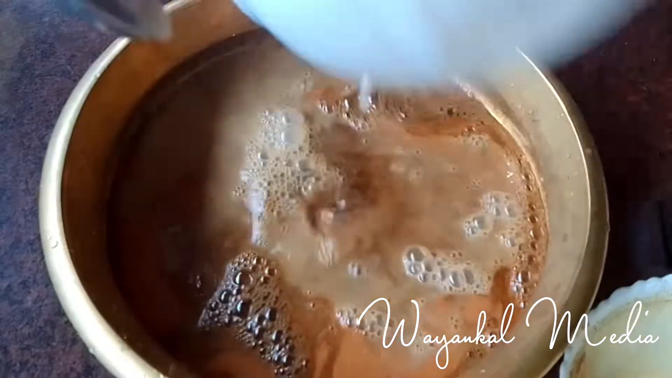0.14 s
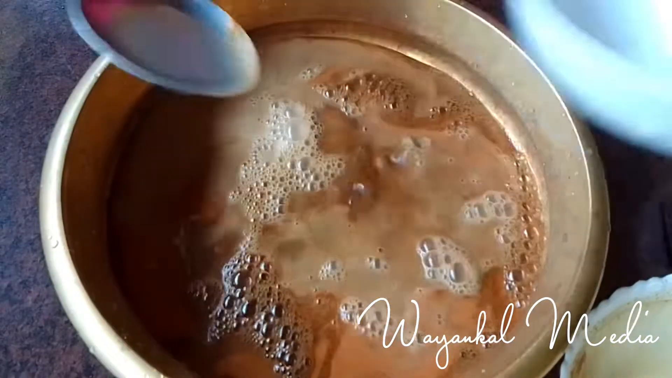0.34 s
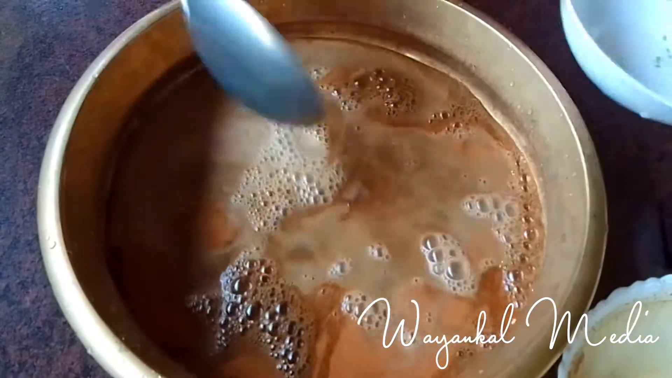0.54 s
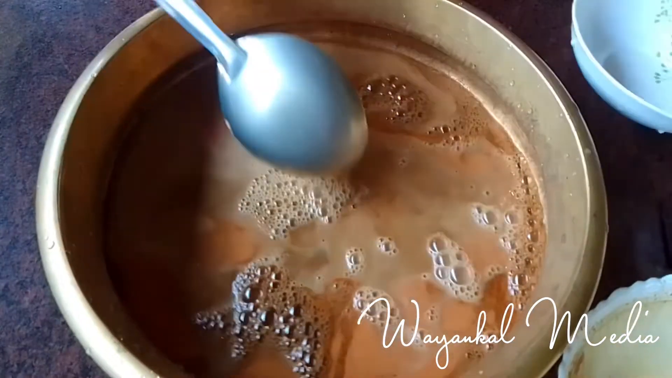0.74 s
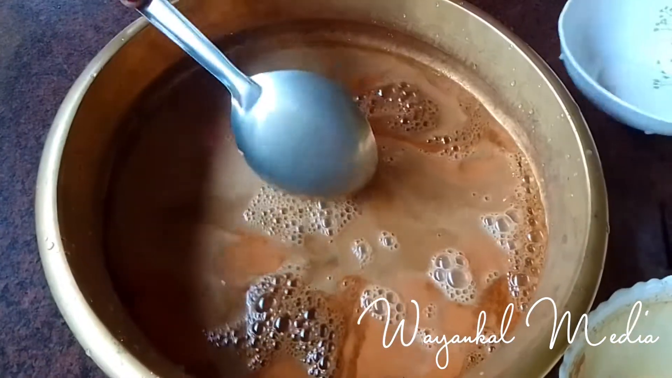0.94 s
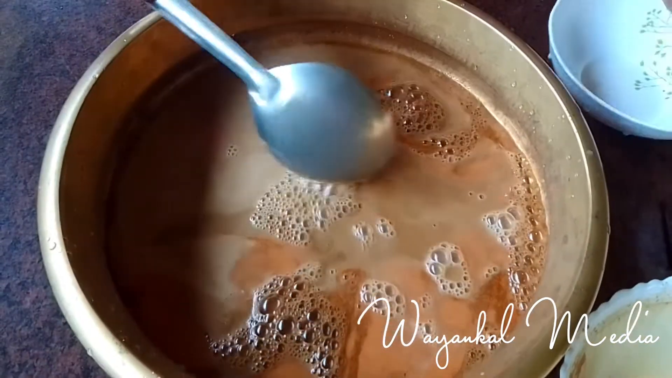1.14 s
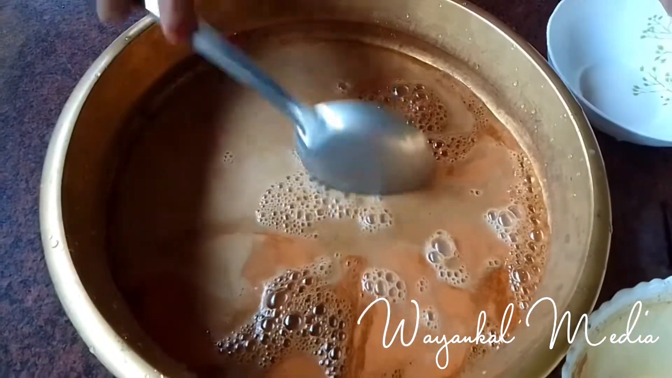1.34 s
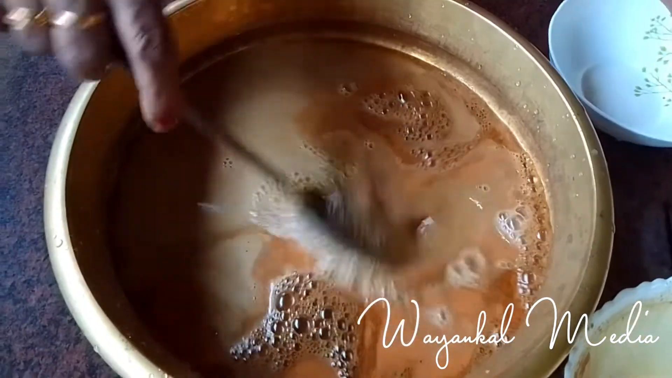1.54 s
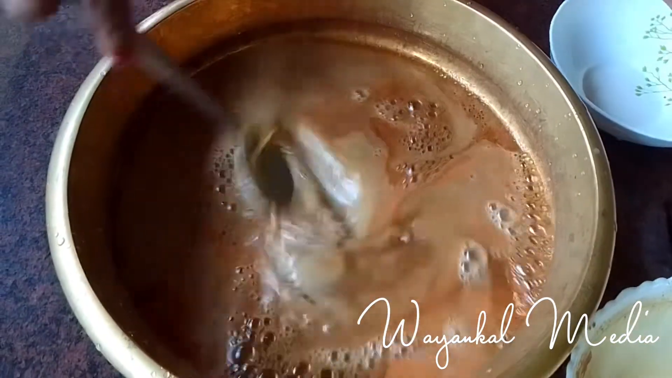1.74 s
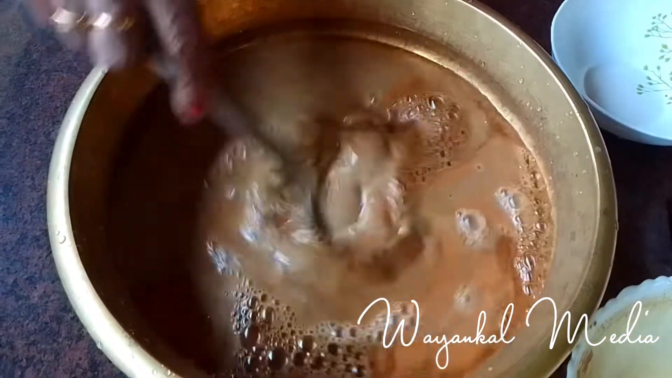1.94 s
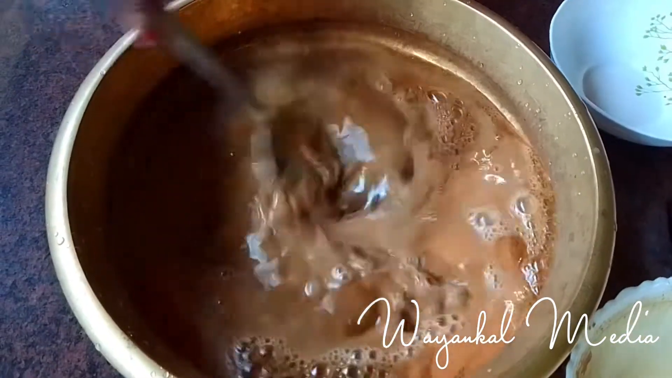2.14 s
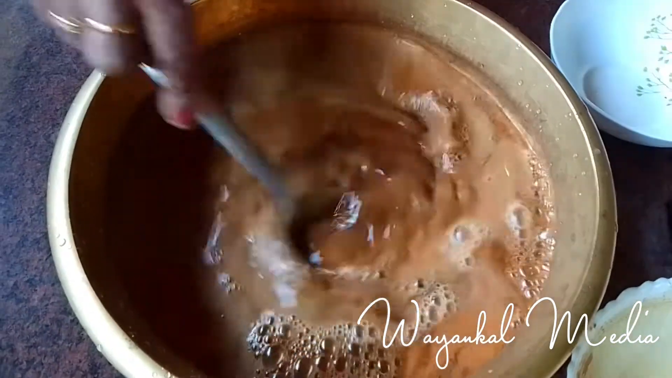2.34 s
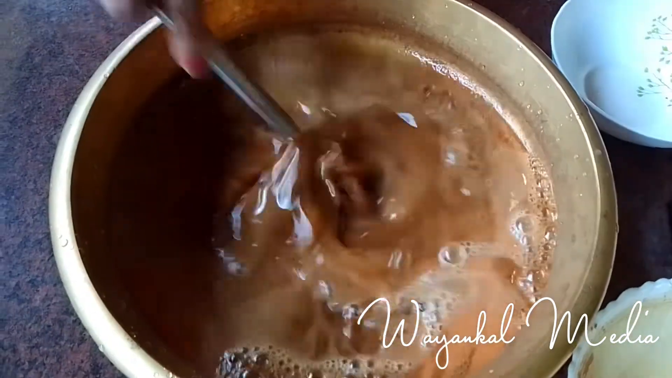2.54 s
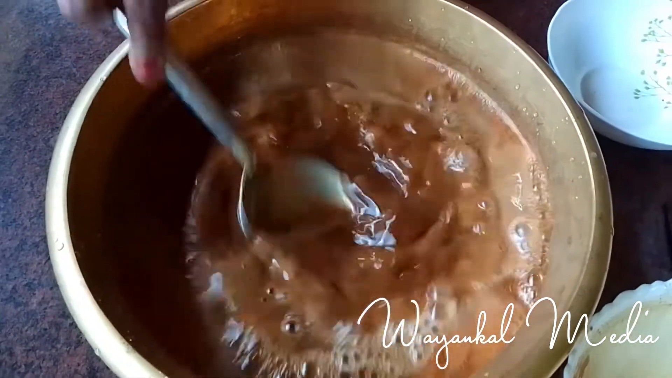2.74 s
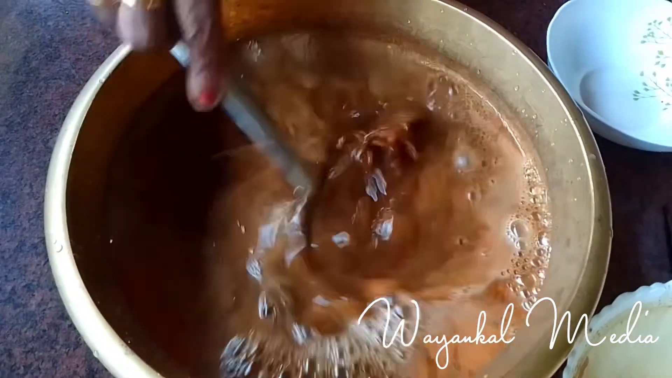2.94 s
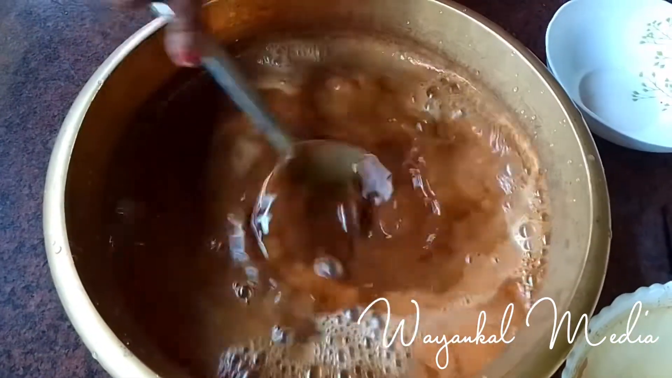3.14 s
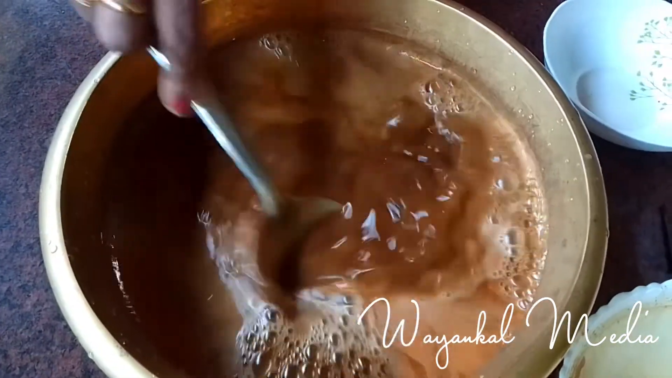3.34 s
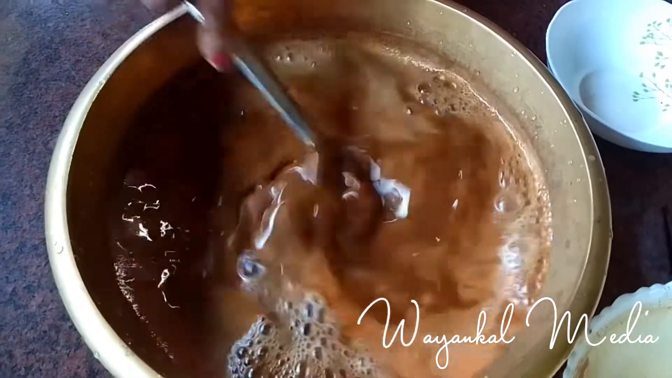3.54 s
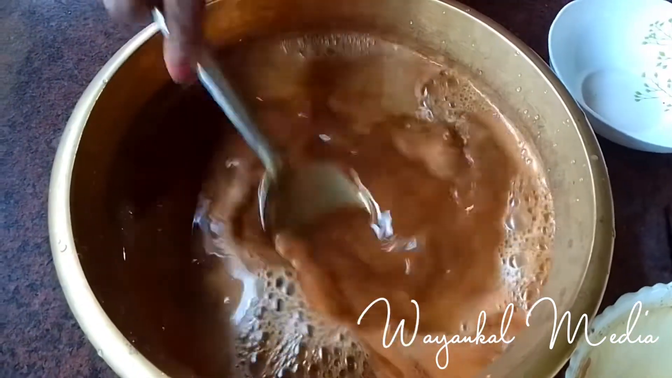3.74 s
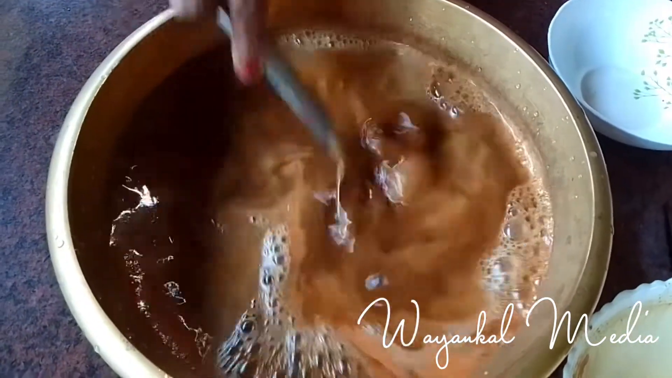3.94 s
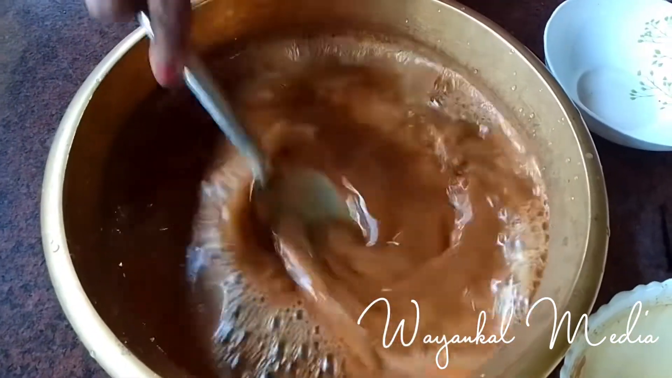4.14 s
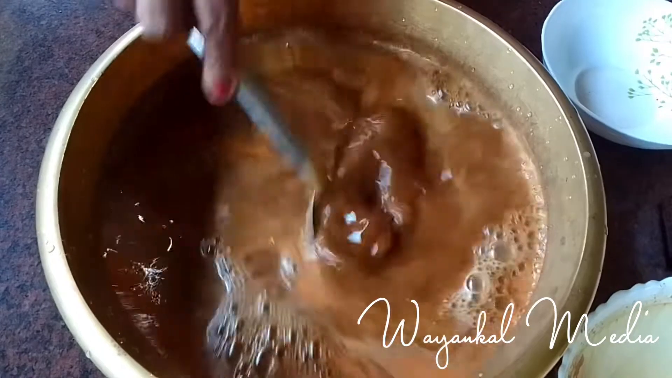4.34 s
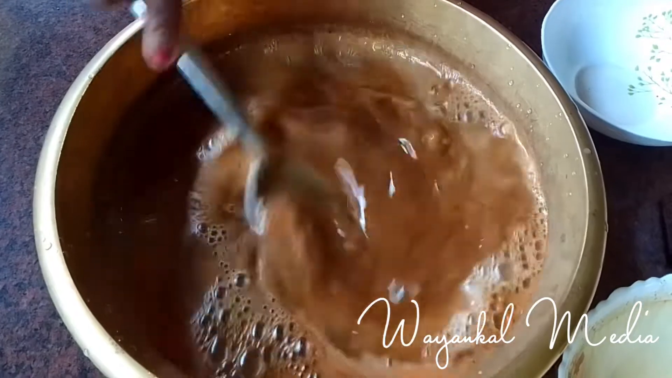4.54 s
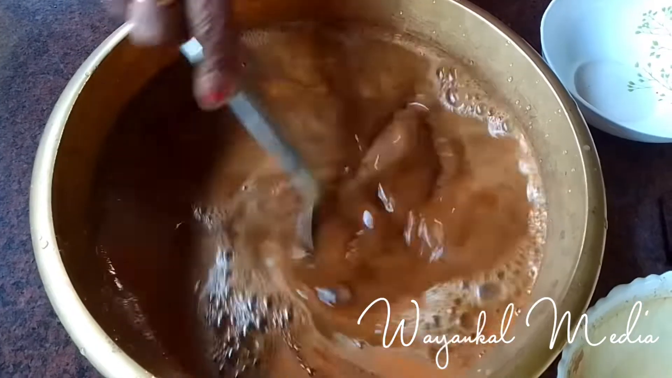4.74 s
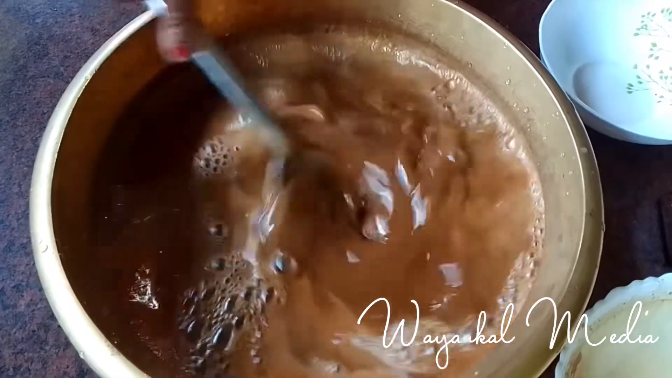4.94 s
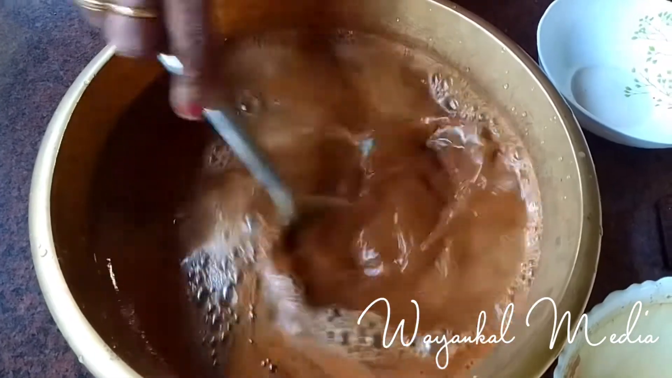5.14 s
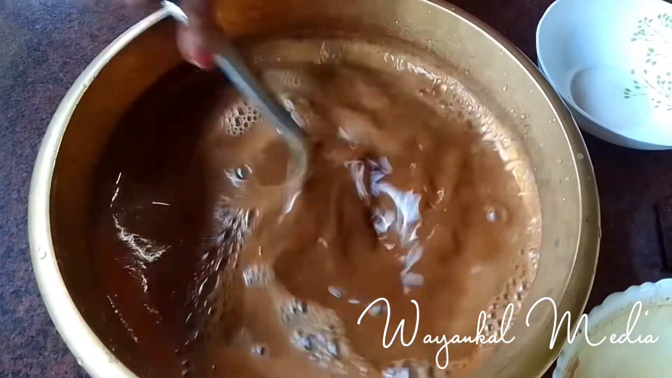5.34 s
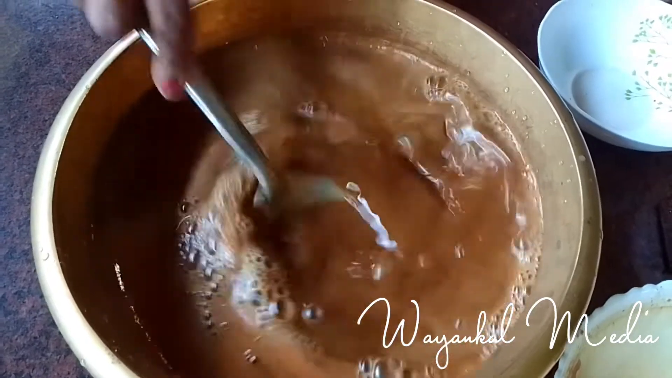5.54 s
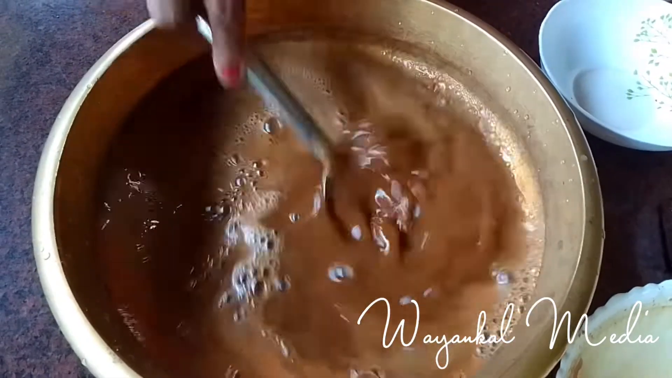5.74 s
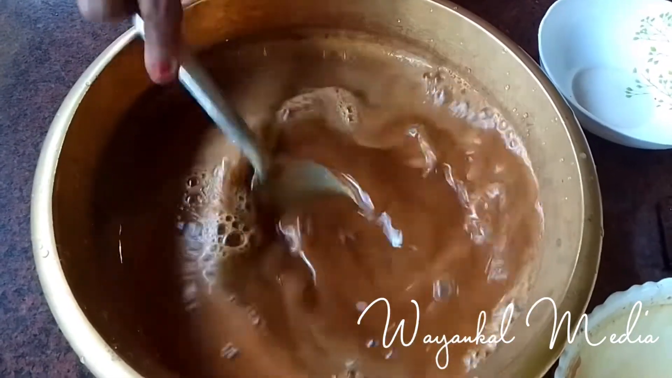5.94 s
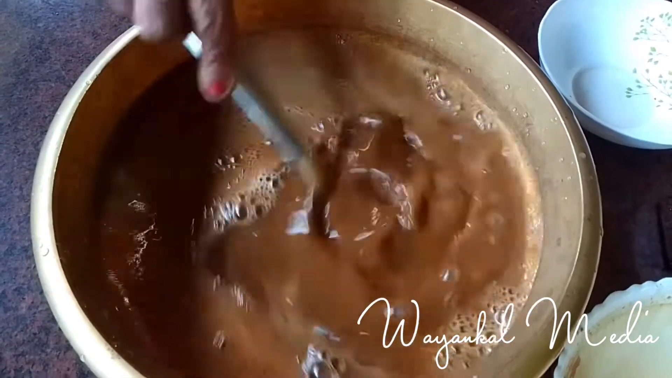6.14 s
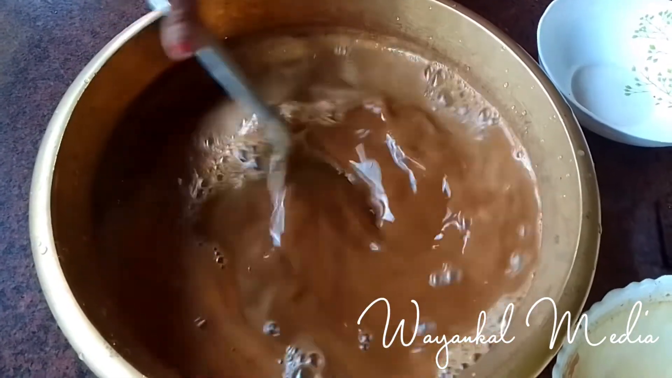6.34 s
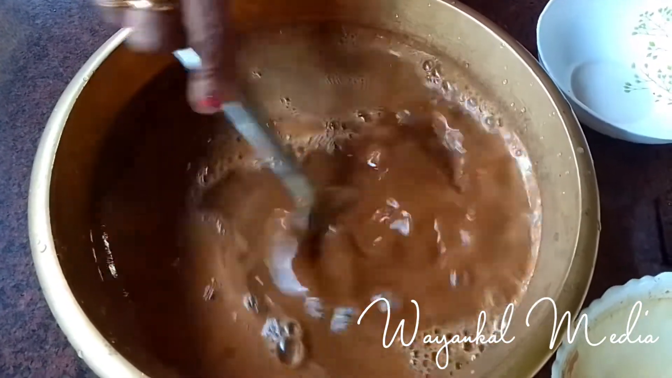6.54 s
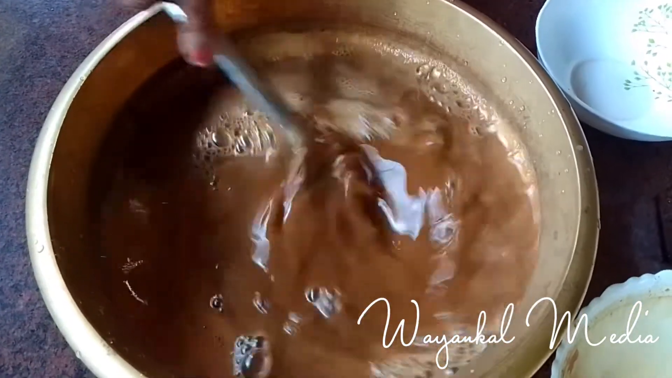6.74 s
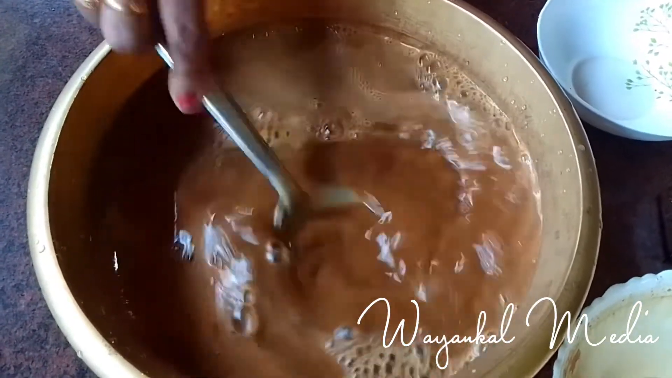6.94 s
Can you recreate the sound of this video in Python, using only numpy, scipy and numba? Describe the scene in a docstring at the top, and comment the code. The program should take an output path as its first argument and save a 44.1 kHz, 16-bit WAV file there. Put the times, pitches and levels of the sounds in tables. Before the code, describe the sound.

The last of a pour dribbles into a pot, a china bowl clatters down, a spoon knocks the rim, then brisk watery stirring continues.

```python
"""The last of some water splashes into a wide brass pot of thin liquid; a china bowl lands and rocks on the counter.
A steel spoon bumps and scrapes the counter, knocks the pot, then stirs: swarms of damped sines make the bubbles
and spray, and gliding tones with a froth of noise make the gulps where air pockets close.
Drifting resonances give the pot's hollow and decaying noise a small kitchen; a few drops tap the close microphone
with short low modes, over filtered-noise air, a low rumble and a wavering hum."""
import sys
import numpy as np
from scipy import signal
from scipy.fft import rfft, irfft, next_fast_len
from scipy.io import wavfile
from scipy.ndimage import map_coordinates
from numba import njit

SR = 44100
rng = np.random.default_rng(int(sys.argv[2]) if len(sys.argv) > 2 else 0)


def wav_out(sig):
    """Save sig, one row per channel (or a flat mono array), as 16-bit PCM at SR to the path in sys.argv[1]."""
    wavfile.write(sys.argv[1], SR, np.round(np.clip(np.atleast_2d(sig).T, -1, 1) * 32767).astype(np.int16))


N = 307818
TIME = np.arange(N) / SR
RING = TIME[:SR]  # one second, for anything that dies away

# Tone of a blow on the counter, also lent to the spoon's clack on the pot.
# Each row: frequency in Hz, level in dB.
COUNTER_COLOUR = [(88, -45.5), (130, -32.5), (210, -12.5), (464, -16), (513, -12), (628, -9.5), (974, -9),
                  (1080, -1.5), (1510, -5), (2860, -25.5), (3170, -29), (3880, -33), (4510, -33),
                  (4910, -44), (8420, -50.5), (10900, -68.5), (18500, -120)]
# Ringing modes of the steel spoon. Each row: frequency in Hz, level in dB, 60 dB decay time in s.
SPOON_MODES = [(3000, -10, .25), (3380, -7, 0.12), (3580, -7, 0.16), (3620, 6, 0.054), (4840, -7.5, .05),
               (5728, -18, .1), (6540, -12, 0.11), (6480, 0, 0.091), (6800, -17, .2), (8511, -24, 0.2)]


def undb(db):
    """Decibels to gain."""
    return 10 ** (np.asarray(db) / 20)


def unit(x):
    """Scale to rms 1."""
    return x / np.sqrt(np.mean(x ** 2))


def at(points, hz):
    """Read (Hz, value) points on a log-frequency axis."""
    f, value = np.transpose(points)
    return np.interp(np.log(np.maximum(hz, 1)), np.log(f), value)


def colour(x, points):
    """Filter by a (Hz, dB) spectrum, causally so that attacks stay sharp."""
    size = next_fast_len(len(x) + SR // 2, True) * 2
    gain = undb(at(points, np.arange(size // 2 + 1) * SR / size))
    # folding the cepstrum forward gives minimum phase
    cepstrum = irfft(np.log(gain))
    cepstrum[1:size // 2] *= 2
    cepstrum[size // 2 + 1:] = 0
    return irfft(rfft(x, size) * np.exp(rfft(cepstrum)))[:len(x)]


def band(x, low_hz, high_hz, order=2):
    """Butterworth band-pass."""
    return signal.sosfilt(signal.butter(order, [low_hz, high_hz], "band", fs=SR, output="sos"), x)


def add(track, s, sound):
    """Mix a sound in at time s."""
    start = max(int(s * SR), 0)
    track[start:start + len(sound)] += sound[:N - start]


def fade(t60):
    """Exponential decay over one second, falling 60 dB in t60 seconds."""
    return np.exp(-np.log(1000) * RING / t60)


def drift(per_s):
    """A random wander through per_s new values a second, with a spread near 1."""
    return np.interp(TIME * per_s, np.arange(512), rng.standard_normal(512))


def churn():
    """Stirred liquid: a swarm of bubbles, a gliding trickle, dense spray, finer mist, and faint deep gurgles."""
    # Tone of the stirred liquid. Each row: frequency in Hz, level in dB.
    stir_colour = [(530, -54), (920, -25), (1060, -1.5), (1250, -4.5), (1370, 2), (1600, -3), (1740, -5.5),
                   (2380, -10.5), (2850, -16.5), (3150, -22), (3460, -16), (4020, -17.5), (4600, -24),
                   (5000, -27), (5400, -31.5), (6480, -31.5), (8420, -48), (10900, -76.5), (18500, -120)]
    bubble_gain, spray_gain, mist_gain = stirring()
    bubbles = cloud(stir_colour, per_s=1800, low_hz=1000, high_hz=2804, cycles=16,
                    spread_db=4.5, rise=0.05, cluster_db=1.5, clusters_per_s=22)
    spray = cloud(stir_colour, per_s=6000, low_hz=2351, high_hz=5380, cycles=9,
                  spread_db=4.0, rise=0.023, cluster_db=2.9, clusters_per_s=19)
    mist = cloud(stir_colour, per_s=4500, low_hz=4900, high_hz=9470, cycles=10,
                 spread_db=5.0, rise=0.019, cluster_db=3.0, clusters_per_s=22)
    # lone bubbles that ring longer and glide upward as they surface
    trickle = cloud(stir_colour, per_s=130, low_hz=1450, high_hz=4408, cycles=32,
                    spread_db=3.0, rise=0.07, cluster_db=2.0, clusters_per_s=12)
    when, pitch, loud = rng.random((900, 3)).T
    deep_hz = 330 * 2.5 ** pitch
    deep_size = undb(3.0 * loud + 9 * pitch)
    deep = ring_bubbles(when * N, deep_hz, np.full(len(when), 3.), deep_size, .04 * pitch)
    swarm = undb(-8) * bubbles + undb(-14) * trickle + undb(-33) * unit(deep)
    # the liquid breaks in fits, all sizes of drop at once
    spatter_db, spatters_per_s = 3.5, 45
    spatter = unit(undb(spatter_db * drift(spatters_per_s)))
    return swirl(bubble_gain * swarm + spatter * (spray_gain * spray + mist_gain * mist))


def stirring():
    """Bubble, spray and mist gains over time; overlapping surges add in power."""
    # Short overlapping surges of bubbles, spray and mist in the stirred liquid. Each row: start in seconds,
    # length in seconds, bubble level in dB, spray level in dB, fine mist level in dB.
    surges = [(1.722, 0.054, -48, -69.5, -83), (1.825, 0.123, -45.5, -65.5, -68),
              (1.943, 0.17, -43.5, -58.5, -70), (2.136, 0.1, -42.5, -62.5, -67.5),
              (2.224, 0.15, -41.5, -58, -63), (2.332, 0.11, -43, -60, -65.5),
              (2.466, 0.16, -42.5, -62.5, -69.5), (2.62, 0.048, -53, -58.5, -70),
              (2.676, 0.2, -42, -59, -70.5), (2.817, 0.1, -53, -61, -66), (2.933, 0.15, -45, -58.5, -72),
              (3.098, 0.24, -47, -58, -71), (3.274, 0.15, -48, -60, -76.5),
              (3.417, 0.11, -41, -60.5, -74.5), (3.585, 0.092, -45, -60, -70),
              (3.718, 0.18, -49, -61.5, -76.5), (3.874, 0.093, -47.5, -60.5, -66.5),
              (3.973, 0.17, -42.5, -54.0, -67.5), (4.151, 0.18, -49, -60.5, -73.5),
              (4.309, 0.074, -45, -57, -64), (4.38, 0.18, -43.5, -60.5, -70.5),
              (4.534, 0.16, -44.5, -66, -71), (4.694, 0.16, -44.5, -56.5, -65.5),
              (4.861, 0.15, -43, -64.5, -67), (5.018, 0.22, -41.5, -58.0, -65),
              (5.224, 0.21, -47, -63, -69.0), (5.425, 0.14, -44.0, -59.5, -68.5),
              (5.577, 0.195, -48, -63.5, -79.5), (5.775, 0.23, -44, -59.5, -72.5),
              (6.013, 0.12, -45.5, -57.0, -72.5), (6.101, 0.12, -47, -57.5, -68),
              (6.198, 0.11, -44, -61.5, -73), (6.351, 0.1, -45, -57.5, -73.5),
              (6.477, 0.11, -42.5, -57.5, -65.5), (6.566, 0.11, -44.5, -58.0, -73),
              (6.724, 0.121, -46, -62, -67.5), (6.83, 0.17, -43.5, -59.5, -69.5)]
    bubbles, spray, mist = np.zeros((3, N))
    for s, length, bubble_db, spray_db, mist_db in surges:
        # bubbles gather more slowly than the spray and outlast it
        quick = swell_and_sag(length, attack_s=0.027, release_s=0.023, sag_db_per_s=12)
        slow = swell_and_sag(length, attack_s=0.034, release_s=0.065, sag_db_per_s=6)
        add(bubbles, s, (undb(bubble_db) * slow) ** 2)
        add(spray, s, (undb(spray_db) * quick) ** 2)
        add(mist, s, (undb(mist_db) * quick) ** 2)
    return np.sqrt([bubbles, spray, mist])


def swell_and_sag(length, attack_s, release_s, sag_db_per_s):
    """A level that rises in a straight line, sags steadily and dies away after its length."""
    attack = np.minimum(RING / attack_s, 1)
    release = np.exp(-np.maximum(RING - length, 0) / release_s)
    return attack * undb(-sag_db_per_s * RING) * release


def cloud(spectrum, per_s, low_hz, high_hz, cycles, spread_db, rise, cluster_db, clusters_per_s):
    """A swarm of bubbles, mostly faint, a few loud, shed in clusters of like size; rms 1."""
    when, pitch, damping, loud, climb = rng.random((int(per_s * N / SR), 5)).T
    hz = low_hz * (high_hz / low_hz) ** pitch
    life = cycles * 2 ** (2 * damping - 1)
    # a random map over time and half-octaves of pitch lifts neighbours together
    place = [when * N / SR * clusters_per_s, 2 * np.log2(high_hz / hz)]
    cluster = map_coordinates(rng.standard_normal((512, 8)), place, order=1, mode="mirror")
    level_db = cluster_db * cluster - spread_db * np.log(loud + 0.0063)
    size = undb(level_db) * hz / np.sqrt(life)  # equal power per Hz before colouring
    bubbles = ring_bubbles(when * N, hz, life, size, rise * climb)
    return unit(colour(in_pot(bubbles, wall_db=-3.5), spectrum))


@njit
def ring_bubbles(start, hz, cycles, size, rise):
    """Each bubble is a damped sine whose pitch climbs as it nears the surface."""
    out = np.zeros(N)
    for k in range(len(start)):
        first = int(start[k])
        life, phase = cycles[k] * SR / hz[k], 0.  # samples, radians
        for i in range(min(int(5 * life), N - first)):
            phase += 2 * np.pi * hz[k] / SR * (1 + rise[k] * i / life)
            swell = 1 - np.exp(-i * hz[k] / SR)
            out[first + i] += size[k] * np.exp(-i / life) * swell * np.sin(phase)
    return out


def swirl(x):
    """The spoon circles toward the wall and away, so the wall's echo colours the rush up and down."""
    echo_db, lag_s, swing_s, turns_per_s = -12.5, 0.001211, .00035, 2.7
    lag = lag_s + swing_s * np.sin(2 * np.pi * turns_per_s * TIME + drift(3))
    echo = map_coordinates(x, [(TIME - lag) * SR], mode="nearest")
    return (x + undb(echo_db) * echo) / np.hypot(1, undb(echo_db))


def gulps():
    """Air pockets in the poured and stirred liquid: closed ones ring briefly and rise, or burst; open ones linger."""
    # Large bubbles pinching off. Each row: start in seconds, start pitch in Hz,
    # rise as a share of that pitch, relative level in dB.
    closing = [(.084, 1830, 0.087, -29), (0.166, 1014, 0.12, -22.5), (.183, 1070, 0.07, -34),
               (2.345, 1560, 0.063, -33.5), (2.365, 1173, 0.12, -31.5), (2.757, 551.4, 0.77, -22.5),
               (2.761, 653, 0.1, -28), (2.773, 925, 0.54, -16), (2.786, 967, 0.23, -28.5),
               (3.114, 1517, 0.016, -25), (3.125, 1590, 0.027, -32), (4.034, 448, 1.3, -37),
               (4.073, 1000, 0.38, -28), (4.087, 1295, 0.35, -22.5), (4.099, 1683, .14, -31),
               (4.117, 674, 0.33, -35), (4.154, 1148, 0.44, -32), (4.476, 1320, 0.19, -32),
               (4.482, 1664, 0.14, -33.5), (4.501, 700, 0.22, -44.5), (4.89, 1450, 0.039, -39.5),
               (5.221, 584, 0.56, -37), (5.578, 716, 0.25, -20), (5.597, 942, 0.22, -29),
               (5.612, 1100, 0.27, -27.5), (5.919, 1255, 0.22, -25), (5.918, 1517, 0.33, -25.5),
               (5.92, 987, 0.09, -31.5), (6.264, 705, 0.024, -31.5), (6.341, 1380, 0.12, -37)]
    # Bubbles that burst as soon as they form. Each row: start in seconds, pitch in Hz, relative level in dB.
    pops = [(.164, 822, -28.5), (.164, 1420, -31.5), (2.204, 1900, -36), (2.21, 1490, -25),
            (2.699, 1450, -32), (2.982, 604, -27), (3.487, 1522, -29), (3.731, 1440, -31.5),
            (4.325, 643, -42.5), (4.327, 1500, -32), (5.044, 1520, -37), (6.264, 1120, -31.5)]
    # Open dimples in the surface that ring on. Each row: start in seconds, start pitch in Hz,
    # glide as a share of that pitch, length in seconds, relative level in dB.
    dimples = [(0.015, 792, 0.015, 0.056, -38.5), (0.062, 725, 0.033, 0.088, -51),
               (.13, 520, -0.11, 0.15, -52), (0.201, 1100, .02, 0.15, -55.5),
               (.275, 506, -0.052, 0.084, -47.5), (2.096, 1257, -0.092, 0.06, -42.5),
               (2.168, 626, 0.5, 0.05, -51), (2.385, 1191, -0.12, 0.083, -39),
               (2.608, 700, -0.2, 0.079, -50), (2.823, 344, -0.064, 0.13, -54),
               (2.998, 439.5, -0.13, 0.072, -45), (3.038, 367.6, -0.12, 0.19, -58.5),
               (3.054, 700, 0.21, 0.064, -41), (3.152, 1368, -0.058, 0.047, -45),
               (3.437, 1100, -0.0037, 0.14, -42.5), (3.491, 1057, -0.029, 0.059, -39.5),
               (3.567, 684, 0.019, 0.077, -46.5), (3.592, 662.6, 0.15, 0.14, -39.5),
               (3.786, 1071, -0.0035, 0.15, -49.5), (3.841, 1340, 0.097, 0.15, -48.5),
               (3.948, 595, -0.04, 0.058, -51.5), (3.974, 361, 0.25, 0.049, -49.5),
               (4.194, 1043, 0.13, 0.081, -42.5), (4.237, 1318, 0.055, 0.088, -39),
               (4.373, 1370, 0.023, 0.098, -46), (4.321, 656, -0.13, 0.14, -46.5),
               (4.569, 1029, 0.22, 0.068, -40.5), (4.894, 1085, 0.057, 0.079, -32.5),
               (5.113, 1150, -0.16, 0.083, -42), (5.255, 800, -0.16, 0.19, -47.5),
               (5.411, 686, -0.095, 0.074, -40.5), (5.757, 438, -0.13, 0.052, -47.5),
               (6.015, 1046, 0.076, 0.096, -43), (6.104, 691, 0.13, 0.2, -45),
               (6.456, 758, 0.021, 0.15, -42.5), (6.505, 1429, 0.011, 0.14, -39),
               (6.797, 599, 0.1, 0.21, -47.5)]
    closed_froth_db, open_froth_db = -10.5, -8.5
    out = np.zeros(N)
    for s, hz, rise, db in closing:
        length = 19.73 / hz  # a fixed count of cycles, so small bubbles are brief
        swell = length * (.14 + 0.36 * rise)  # the further it climbs, the later it is loudest
        add(out, s, undb(db) * air_pocket(hz, rise, swell, length, closed_froth_db))
    for s, hz, db in pops:
        add(out, s, undb(db) * air_pocket(hz, 0.32, 0.0012, 5 / hz, closed_froth_db))
    for s, hz, glide, length, db in dimples:
        add(out, s, undb(db) * air_pocket(hz, glide, length * 0.12, length, open_froth_db))
    return out


def air_pocket(start_hz, glide, swell, length, froth_db):
    """A pocket of air swells, rings with a gliding pitch and breaks up into a froth of smaller bubbles."""
    t, end_hz = RING[:SR // 3], start_hz * (1 + glide)
    hz = start_hz + (end_hz - start_hz) * np.minimum(t / length, 1.3)
    rising = np.minimum(t / swell, 1)
    past_peak = np.maximum(t - swell, 0)
    dying = past_peak / max(length - swell, .002)
    # a fresh bubble rings cleanly; then the moving surface shakes its level and pitch
    shake, wobble = (unit(band(rng.standard_normal(len(t)), 15, 55)) * np.minimum(t / 0.011, 1)
                     for _ in range(2))
    phase = 2 * np.pi * np.cumsum(hz) / SR + 0.43 * wobble
    tone = undb(-15 * dying + 1.2 * shake) * np.sin(phase)
    low_hz, high_hz = 0.942 * min(start_hz, end_hz), 1.062 * max(start_hz, end_hz)
    froth = unit(band(rng.standard_normal(len(t)), low_hz, high_hz, order=3))
    lingering = undb(-15 * past_peak / (length + 0.0011))
    return rising * (tone + undb(froth_db) * lingering * froth)


def pour():
    """The thinning stream drives bubbles under the surface and throws a little spray."""
    # The thinning stream. Each row: time in seconds, bubble level in dB, spray level in dB.
    stream = [(0, -37, -55.5), (.03, -46, -74), (.055, -41, -71), (.075, -61, -75), (.11, -61.5, -82),
              (.15, -68, -85)]
    # Tone of the larger bubbles a falling stream traps. Each row: frequency in Hz, level in dB.
    pour_colour = [(400, -16.5), (750, -5), (1150, 0), (1450, -14), (1900, -5.5), (2800, -14.5),
                   (6000, -28)]
    bubble_gain, spray_gain = flow(stream)
    bubbles = cloud(pour_colour, per_s=1100, low_hz=605, high_hz=2730, cycles=3.7,
                    spread_db=3.5, rise=0.03, cluster_db=3.5, clusters_per_s=21)
    spray = unit(band(rng.standard_normal(N), 2200, 6300, order=3))
    return bubble_gain * bubbles + spray_gain * spray


def flow(curve):
    """Bubble and spray gains over time; the stream is silent before and after."""
    s, bubble_db, spray_db = np.transpose(curve)
    moving = (TIME >= s[0]) & (TIME <= s[-1] + .01)
    return moving * undb([np.interp(TIME, s, bubble_db), np.interp(TIME, s, spray_db)])


def splats():
    """A drop lands with a smack and traps one tiny bubble that chirps upward."""
    # Single drops landing on the surface, strong and faint. Each row: start in seconds, smack level in dB,
    # pitch of the trapped bubble in Hz, bubble level in dB.
    drops = [(0.018, -47, 5800, -59), (0.041, -46, 4900, -57), (0.049, -52, 3400, -38.5),
             (.072, -62, 6230, -47), (0.083, -49, 3920, -54), (.096, -52, 6600, -48),
             (.097, -56, 4630, -48), (.107, -68, 4100, -57), (.125, -63, 4660, -52),
             (0.164, -49, 4260, -50), (0.177, -53, 4400, -46), (1.744, -61, 3820, -48),
             (1.839, -61, 2020, -41), (2.229, -46.5, 5160, -54), (2.247, -47, 2300, -38),
             (2.71, -53, 2600, -37), (2.808, -45, 5730, -45.5), (2.956, -49, 3840, -42),
             (2.9808, -47, 2400, -50), (3.113, -50, 2730, -46), (3.1264, -45.5, 3100, -40),
             (3.987, -56, 3580, -46), (4.154, -45, 3250, -36.5), (4.191, -50, 5860, -45.5),
             (4.9676, -43.5, 2590, -50), (5.443, -46.5, 3780, -38.5), (5.7489, -46.5, 5950, -38.5),
             (5.9183, -39.5, 2680, -44), (6.047, -77, 4020, -44), (6.184, -59, 3600, -34.5)]
    rise_per_s = 14  # share of its pitch that the bubble climbs each second
    out = np.zeros(N)
    for s, smack_db, hz, bubble_db in drops:
        smack = unit(band(rng.standard_normal(SR), 560, 5920, order=4)) * fade(0.018)
        chirp = np.sin(2 * np.pi * hz * RING * (1 + rise_per_s * RING / 2)) * fade(0.014)
        add(out, s, (undb(smack_db) * smack + undb(bubble_db) * chirp) * (1 - fade(0.006)))
    return out


def in_pot(x, wall_db):
    """Sound bounces between moving liquid and brass wall for a few hundredths of a second, on ever-changing paths."""
    paths = rng.standard_normal(size=(3, SR)) * fade(0.041) * (RING > .001)
    paths = paths[:, :SR // 10]
    # the surface keeps shifting the balance of three paths, nine times a second
    shares = np.array([drift(9) for _ in paths])
    shares /= np.sqrt(np.sum(shares ** 2, axis=0))
    bounces = 0
    for share, path in zip(shares, paths):
        bounces = bounces + share * signal.oaconvolve(x, path / np.sqrt(np.sum(path ** 2)))[:N]
    return x + undb(wall_db) * bounces


def pot_hollow(x):
    """The air between the liquid and the rim favours a few pitches, which glide as the surface heaves."""
    # Resonances of the pot's air. Each row: frequency in Hz, width in Hz, level in dB.
    pot_air = [(700, 11, -21), (1060, 41, -9.5), (1329, 57, 1.5), (1534, 80, -3.5), (2300, 180, -16)]
    sway_share, sways_per_s = 0.024, 7
    out = x
    for hz, width, db in pot_air:
        moving_hz = hz * (1 + sway_share * drift(sways_per_s))
        out = out + undb(db) * resonate(x, moving_hz, float(width))
    return out


@njit
def resonate(x, hz, width):
    """A band-pass whose centre may move every sample; gain 1 at the centre."""
    out, b, low = np.empty(len(x)), 0., 0.
    for i in range(len(x)):
        g, k = np.tan(np.pi * hz[i] / SR), width / hz[i]
        v = (b + g * (x[i] + 1e-18 - low)) / (1 + g * (g + k))
        b, low, out[i] = 2 * v - b, low + 2 * g * v, k * v
    return out


def pot_knocks():
    """The spoon clacks on the brass; the ring builds as it spreads round the wall, and the liquid damps it."""
    # The spoon meets the pot. Each row: start in seconds, pot level in dB, tick level in dB, steel ring level in dB.
    pot_hits = [(1.545, -24.5, -45, -73), (1.599, -41, -57, -81)]
    # Modes of the filled brass pot. Each row: frequency in Hz, level in dB, 60 dB decay time in s.
    pot_modes = [(208.3, -15.5, 0.18), (705, -24, 0.63), (747, -16.5, 0.35), (1078, -1.5, 0.1),
                 (1232, -0.5, 0.18), (1295, -17, 0.085), (1526, -11.5, 0.11), (1700, -11.5, 0.12),
                 (1927, -23.5, 0.23), (2296, 1, 0.065), (3650, -6.5, 0.039), (4670, -8.5, 0.016),
                 (5700, -46, 0.087), (6760, -42, 0.097)]
    out = np.zeros(N)
    for s, pot_db, tick_db, steel_db in pot_hits:
        clack = unit(colour(rng.standard_normal(SR), COUNTER_COLOUR))
        clack = clack * (undb(-3.5) * fade(0.073) + undb(-25.5) * fade(0.89))
        tick = unit(band(rng.standard_normal(SR), 2500, 5800, order=4)) * fade(0.019)
        wall = shell(pot_modes, split_hz=18.5, rough_db=3.5) * (1 - fade(0.091))
        # the waves round the wall meet again
        swell = np.sin(2 * np.pi * 1240 * RING) * np.exp(-((RING - .0105) / 0.0026) ** 2)
        pot = undb(4.5) * wall + undb(5.0) * swell + clack
        add(out, s, undb(pot_db) * pot + undb(tick_db) * tick + undb(steel_db) * ring(SPOON_MODES))
    return out


def bowl_set_down():
    """The china bowl lands and rocks, ringing as it strikes the counter."""
    # Contacts of the bowl. Each row: start in seconds, counter level in dB, china ring level in dB,
    # contact brightness in Hz.
    bowl_hits = [(.8285, -22, -32, 8140), (.834, -37, -53, 8000), (.841, -57, -43, 4000),
                 (.8625, -22.5, -43, 6000), (.874, -22, -37, 4000), (.891, -27.5, -76, 2000),
                 (.909, -34, -52.5, 1900)]
    # Modes of the china bowl. Each row: frequency in Hz, level in dB, 60 dB decay time in s.
    bowl_modes = [(2643, -30, .25), (3092, -6.5, 0.27), (3190, -15, .18), (3430, -27, 0.3),
                  (3700, -28, .35), (4183, -29, 0.2), (4463, -27, .22), (4625, -13.5, 0.22),
                  (5686, -11.5, 0.1), (6410, -17, 0.1), (6514, -23, 0.1), (8366, -38, 0.13),
                  (8560, -40, 0.09)]
    return counter_knocks(bowl_hits, bowl_modes)


def spoon_taken_up():
    """The steel spoon bumps along the counter as it is taken up."""
    # Bumps of the spoon. Each row: start in seconds, counter level in dB, steel ring level in dB,
    # contact brightness in Hz.
    spoon_hits = [(1.377, -32, -60, 2620), (1.388, -27, -75, 1100), (1.42, -30, -82, 1120),
                  (1.443, -38, -79, 1120), (1.49, -37, -85, 1110), (1.52, -36.5, -79, 1500)]
    return counter_knocks(spoon_hits, SPOON_MODES)


def spoon_scrape():
    """The dragged spoon catches and slips, which keeps a rough, thin ring going in the steel."""
    # Bands where the dragged steel sings. Each row: frequency in Hz, width in Hz, level in dB.
    scrape_bands = [(3750, 260, -5), (4600, 2800, 1), (6740, 310, 1), (8500, 250, -11)]
    start_s, length_s, scrape_db = 1.378, 0.17, -78
    out = np.zeros(N)
    friction = rng.standard_normal(N) * undb(3.7 * drift(60))
    steel = unit(sum(undb(db) * unit(band(friction, hz - width / 2, hz + width / 2))
                     for hz, width, db in scrape_bands))
    drag = swell_and_sag(length_s, attack_s=.004, release_s=.03, sag_db_per_s=18)
    add(out, start_s, undb(scrape_db) * steel[:SR] * drag)
    return out


def counter_knocks(hits, modes):
    """Each blow cracks, shakes the counter and rings the object that struck it."""
    # Modes of the counter. Each row: frequency in Hz, level in dB, 60 dB decay time in s.
    counter_modes = [(208, -6, 0.74), (511, 7, 0.29), (527, 1, 0.21), (955, -11, 0.096), (1100, -6, 0.21),
                     (1180, -12, 0.36), (1320, 0.5, .4), (1370, -5, .4)]
    # How long the counter's dense modes last. Each row: frequency in Hz, 60 dB decay time in s.
    counter_t60 = [(150, 1), (400, 0.31), (1040, 0.36), (2760, 0.36), (7280, 0.42)]
    out = np.zeros(N)
    for s, counter_db, ring_db, bright_hz in hits:
        crack = undb(5.0) * rng.standard_normal(SR) * fade(0.038)
        shaken = colour(crack + tail(counter_t60), COUNTER_COLOUR)
        body = undb(6.5) * shaken + undb(-27.0) * ring(counter_modes)
        ringing = shell(modes, split_hz=-16, rough_db=2.5) * (1 - fade(0.0036)) ** 2
        add(out, s, undb(counter_db) * soften(body, bright_hz) + undb(ring_db) * ringing)
    return out


def ring(modes):
    """Decaying sines of a struck object."""
    return sum(undb(db) * np.sin(2 * np.pi * hz * RING) * fade(t60) for hz, db, t60 in modes)


def shell(modes, split_hz, rough_db):
    """Slight asymmetry makes each mode a close pair that beats; whatever touches the object roughens the ring."""
    out = np.zeros(SR)
    for hz, db, t60 in modes:
        partner_hz = hz + split_hz * rng.uniform(1.0, 2.3)
        pair = ring([(hz, db, t60), (partner_hz, db - 11, t60)])
        # a new random level 130 times a second
        rough = np.interp(RING * 130, np.arange(256), rng.standard_normal(256))
        out += pair * unit(undb(rough_db * rough))
    return out


def soften(x, hz):
    """A contact that lasts longer pushes in less treble."""
    return signal.sosfilt(signal.butter(3, min(hz, SR / 5), fs=SR, output="sos"), x)


def tail(t60s):
    """Countless overlapping modes: white noise whose half-octaves die at their own rates."""
    noise = rfft(rng.standard_normal(SR))
    octave = np.round(2 * np.log2(np.maximum(np.arange(len(noise)), 100))) / 2
    return sum(irfft(noise * (octave == k), SR) * fade(at(t60s, 2 ** k)) for k in np.unique(octave))


def taps():
    """A drop on the microphone's housing: a dry tick and a short low thump."""
    # Drops on the microphone. Each row: start in seconds, tick level in dB, thump level in dB.
    mic_drops = [(0.5039, -38.5, -87), (4.795, -37.5, -64), (4.866, -48, -60.5), (5.489, -35, -62),
                 (5.524, -11.5, -10)]
    out = np.zeros(N)
    for s, tick_db, thump_db in mic_drops:
        tick = ring([(1200, 4.2, 0.0066), (410, 7.8, 0.0042)]) * (1 - fade(0.0088))
        thump = ring([(103.5, -15.0, 0.056), (151, -10, 0.023), (401, -24, 0.048)]) * (1 - fade(0.023))
        add(out, s, soften(undb(tick_db) * tick + undb(thump_db) * thump, 3000))
    return out


def kitchen(x, wet_db):
    """Direct sound plus the reverberation of a small hard room."""
    # How long the room rings. Each row: frequency in Hz, 60 dB decay time in s.
    room_t60 = [(200, 1), (1000, 0.51), (3000, 0.91), (5500, 0.6), (9000, 0.42)]
    # Tone of the room. Each row: frequency in Hz, level in dB.
    room_colour = [(100, 0.5), (500, 2), (1200, 0), (3000, -14.5), (9000, 2.5)]
    onset = np.clip(RING / 0.0058 - .5, 0, 1)  # nothing for 2.9 ms, then a quick build-up
    echo = colour(tail(room_t60), room_colour) * onset
    return x + undb(wet_db) * signal.fftconvolve(x, echo / np.sqrt(np.sum(echo ** 2)))[:N]


def background():
    """Faint room air as coloured noise, over a low rumble and a wavering hum that dip together briefly."""
    # Tone of the room air. Each row: frequency in Hz, level in dB.
    air_colour = [(59, -45.5), (100, -25), (188, -11.5), (239, -6), (316, -7), (502, -10.5), (551, -14),
                  (627, -8.5), (909, -10), (1340, -12), (2480, -32), (4500, -40), (8420, -43.5),
                  (10900, -100), (18500, -120)]
    # Tone of the low rumble. Each row: frequency in Hz, level in dB.
    rumble_colour = [(30, -1), (52, -5), (64, -2), (82, -3), (120, -6), (150, -18), (400, -42)]
    # Hum tones, before their waver. Each row: frequency in Hz, level in dB.
    hum_tones = [(37, -66), (80, -82)]
    # The brief dip in rumble and hum. Each row: time in seconds, level in dB.
    low_dip = [(.48, 0), (.6, -14), (.8, -14), (1.1, -3), (1.25, 0)]
    air = unit(colour(rng.standard_normal(N), air_colour))
    rumble = unit(band(colour(rng.standard_normal(N), rumble_colour), 25, 400, order=4))
    hum = np.zeros(N)
    for hz, db in hum_tones:
        tone = np.sin(2 * np.pi * hz * TIME + .9 * drift(6))
        hum += undb(db) * tone * undb(2.5 * drift(6))
    dip = undb(np.interp(TIME, *np.transpose(low_dip)))
    return undb(-71) * air + (undb(-69.5) * rumble + hum) * dip


def scene():
    """Liquid and knocks in the kitchen; the taps, right on the microphone, stay nearly dry."""
    pockets_and_drops = in_pot(undb(-5.0) * gulps() + splats(), wall_db=-23.0)
    liquid = pot_hollow(pour() + churn() + pockets_and_drops)
    knocks = bowl_set_down() + spoon_taken_up() + spoon_scrape() + pot_knocks()
    in_room = kitchen(liquid, wet_db=-8.5) + kitchen(knocks, wet_db=-10.0)
    return (in_room + kitchen(taps(), wet_db=-17.0) + background())[None]


def record(dry):
    """The microphone dips slightly near 9 kHz and lifts toward 13 kHz; a steep low-pass cuts the top at 13.8 kHz."""
    toned = colour(dry[0], [(8400, 0), (9000, -2), (13000, 3.5)])
    return signal.sosfilt(signal.ellip(8, .2, 70, 13800, fs=SR, output="sos"), toned)[None]


dry = scene()
out = record(dry)
wav_out(out)
```